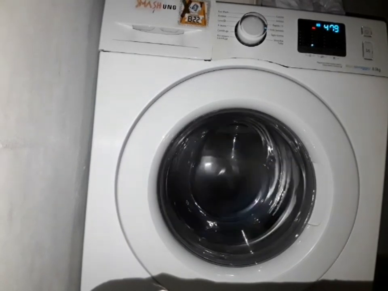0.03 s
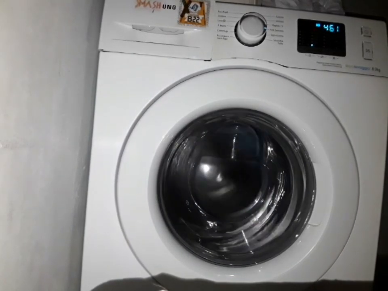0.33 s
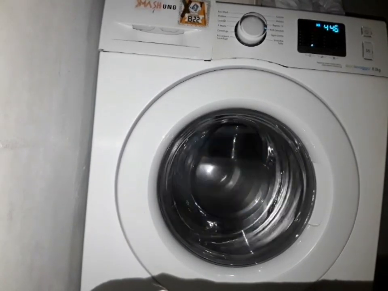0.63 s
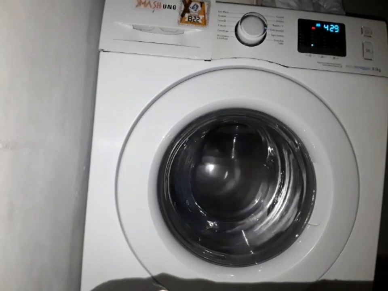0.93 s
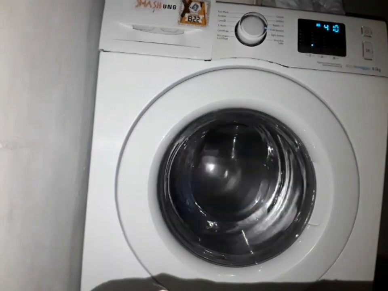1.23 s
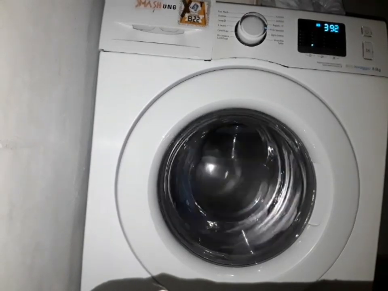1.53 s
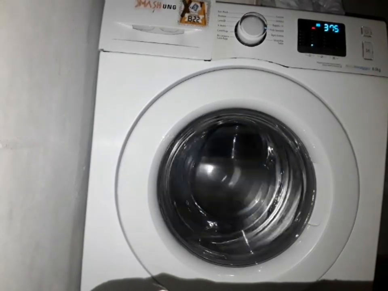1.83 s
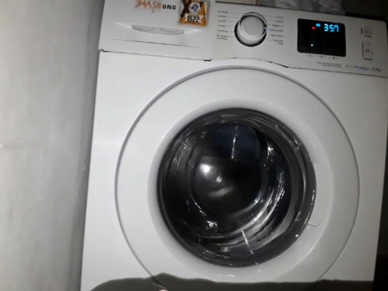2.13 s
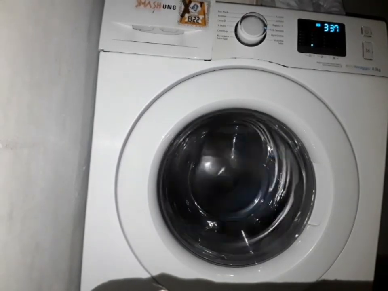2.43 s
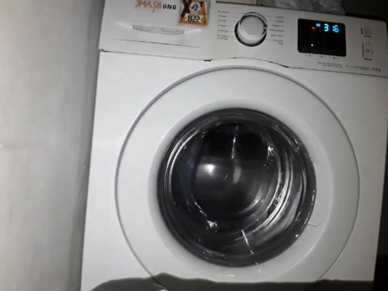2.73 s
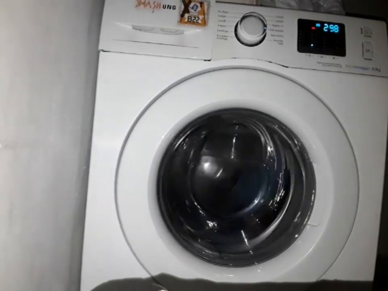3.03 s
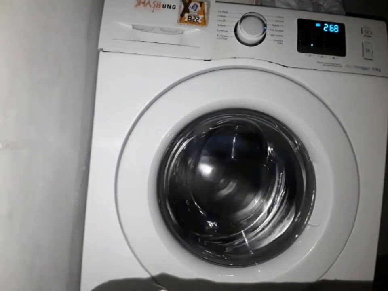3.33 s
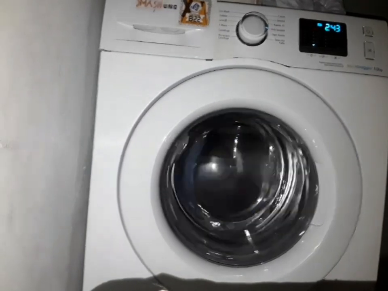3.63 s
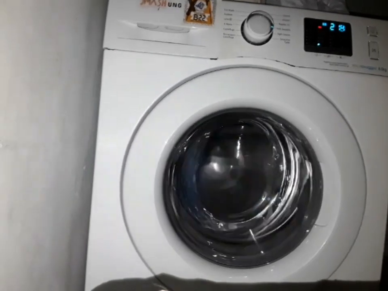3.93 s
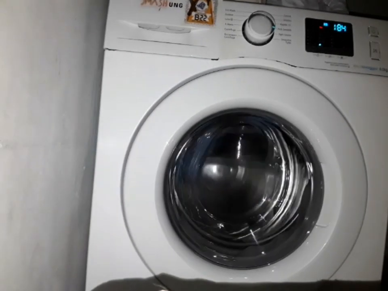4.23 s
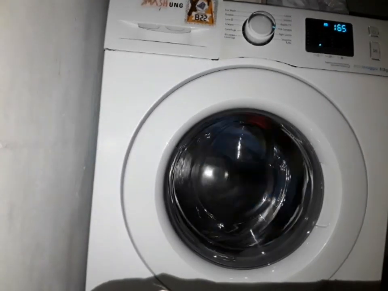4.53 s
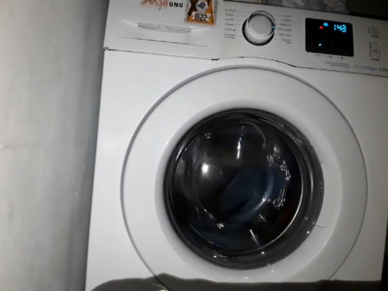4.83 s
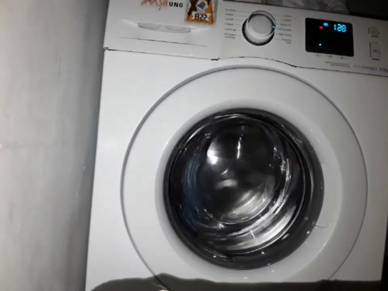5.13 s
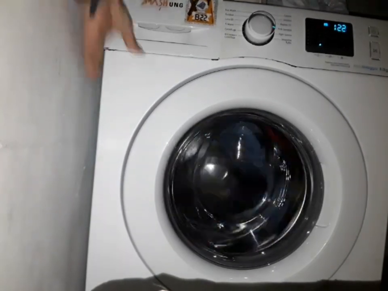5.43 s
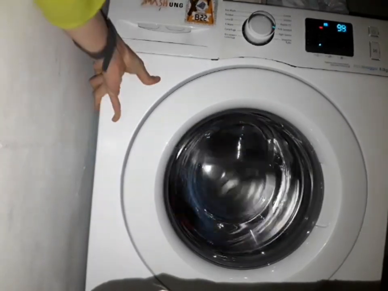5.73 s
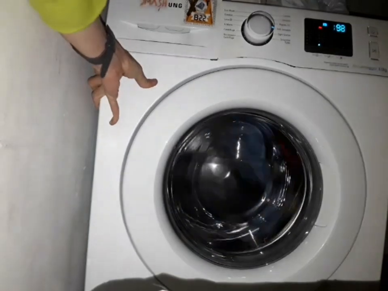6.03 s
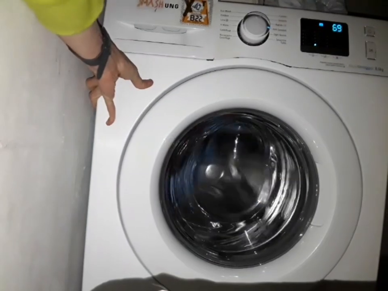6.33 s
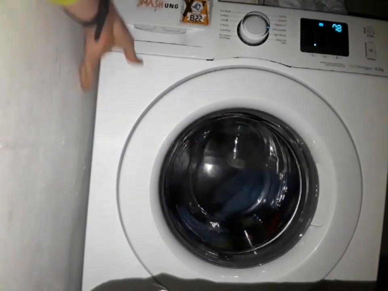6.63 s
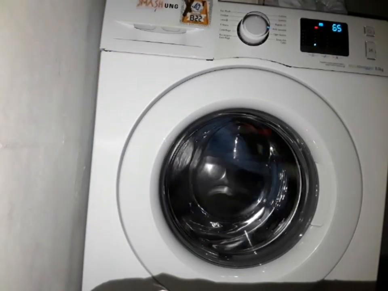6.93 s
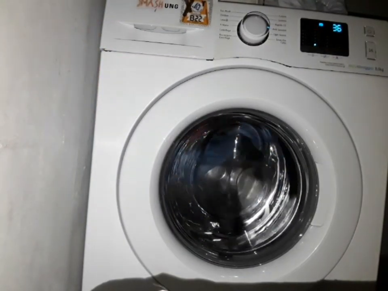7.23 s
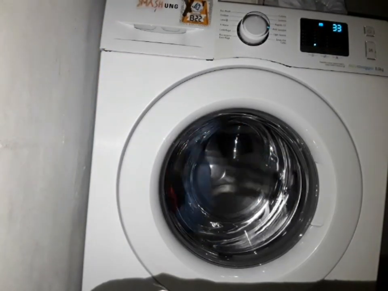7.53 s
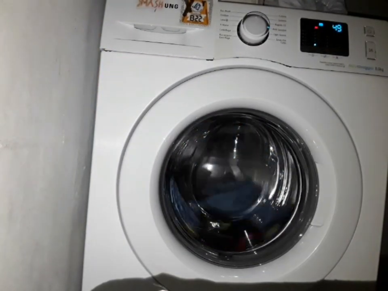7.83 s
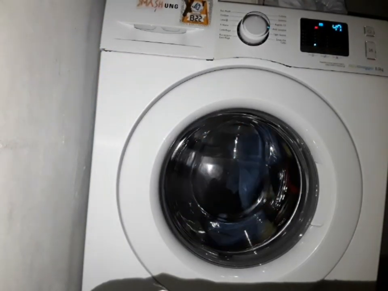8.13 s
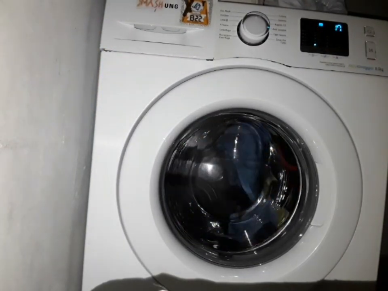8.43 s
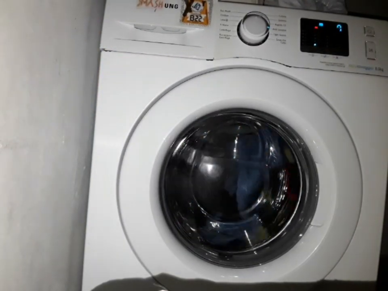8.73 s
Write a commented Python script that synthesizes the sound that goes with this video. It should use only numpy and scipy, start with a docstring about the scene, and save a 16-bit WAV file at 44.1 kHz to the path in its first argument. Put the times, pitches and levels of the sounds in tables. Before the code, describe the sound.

A washing machine slows from a rumbling, hissing spin, knocks and scrapes as it shakes, then quiets to soft flops and swishes.

```python
"""A washing machine spins down

A front-loader with a worn drum bearing coasts down from its spin in a small room. The bearing rumbles
in the same pattern on every turn while the motor's whine falls. At the speed where its springs shake
most, the tub swings out and rasps against the cabinet. Then the wet laundry comes loose, flops and
slides about, with a few squeaks and ticks, until only a soft drone and faint swishes are left."""
import sys
import numpy as np
from scipy import signal
from scipy.fft import rfft, irfft
from scipy.io import wavfile
from scipy.ndimage import uniform_filter1d

SR = 44100
rng = np.random.default_rng(int(sys.argv[2]) if len(sys.argv) > 2 else 0)


def bounce(signal):
    """Save signal as a 16-bit WAV file at the path given by the first command-line argument."""
    frames = np.transpose(np.atleast_2d(signal))
    limited = np.clip(frames, -1, 1)
    pcm = np.round(limited * 32767).astype(np.int16)
    wavfile.write(sys.argv[1], SR, pcm)


N = 387198
TIME = np.arange(N) / SR

# The drum slows down. Each row: time in seconds, speed in turns per second.
DRUM_SPEED = [(0, 8.007), (.5, 7.477), (1, 7.028), (1.5, 6.517), (2, 6.03), (2.5, 5.488), (3, 4.923),
              (3.5, 4.256), (4, 3.5), (4.5, 2.8), (5.5, 2), (6.5, 1.4), (7.5, .7), (8.8, .2)]
def drum():
    """The drum's motion: how many turns it has made so far, and how fast it is going."""
    speed, = in_time(DRUM_SPEED)
    return np.cumsum(speed) / SR, speed

# Pits in the bearing's track. Each row: position in turns, strength in dB, width in turns.
BEARING_PITS = [(0.045, -4, 0.028), (0.142, -2, 0.0088), (0.214, -26, 0.03), (0.318, -8, 0.0033),
                (0.391, -2, 0.0071), (0.436, 6, 0.045), (0.475, 0, 0.016), (0.557, -4, 0.0044),
                (0.662, -8.5, 0.0061), (0.887, 4, 0.0093), (0.949, -1, 0.0072)]
# The tone of the grinding. Each row: pitch in Hz, level in dB.
GRIND_SPECTRUM = [(20, -25), (40, -19), (65, 4), (120, -12), (250, -8.5), (400, -16), (700, -25),
                  (3000, -57)]
def bearing(turns, speed):
    """Pits knock at the same spots on every turn; as the drum slows, the rough track's grind takes over."""
    pits = sum(from_db(db) * np.exp(-(turns_from(turns, angle) / width) ** 2)
               for angle, db, width in BEARING_PITS)
    knocks = evened(cabinet(pits * from_db(.5 * drift(25)), direct=0.11), 0.0317)
    track = np.interp(turns, np.linspace(0, 1, 1024), rng.standard_normal(1024), period=1)
    roughness = colour(0.8 * rms_one(track) + 4 * noise(), GRIND_SPECTRUM)
    grind = evened(cabinet(roughness, direct=0.2), 0.043)
    knock_share = np.interp(speed, [2, 4.5, 6.5], [.15, .55, .92])
    return np.sqrt(knock_share) * knocks + np.sqrt(1 - knock_share) * grind

# The notes of the tub and cabinet panels. Each row: pitch in Hz, width in Hz, level in dB.
PANEL_NOTES = [(67.9, 4.9, -6), (80.7, 5.2, -5.5), (103.4, 9.4, -0.5), (163.7, 10.7, 3.5), (212.4, 9.2, 3),
               (250.6, 29, -1.5), (274.5, 11, 0.5), (323.6, 25, 2.5), (398, 21, -6), (495, 8.1, -27),
               (553, 17, -11.5), (660, 19, -24), (884, 25, 8)]
def cabinet(x, direct):
    """Shaken panels ring, neighbouring notes in opposite directions, over a little direct sound."""
    ringing = sum((-1) ** k * from_db(db) * resonance(x, hz, width)
                  for k, (hz, width, db) in enumerate(PANEL_NOTES))
    return ringing + direct * resonance(x, 420, 500)

# Two pushes a turn. Each row: position in turns, width in turns, then the swell of rumble, roar and
# hiss in dB, before the speed scales it.
LOAD_PUSHES = [(.04, .18, 6.5, 2.8, 2.5), (.49, 0.15, 6, 0.7, 0.6)]
def surges(turns, speed):
    """The lopsided load presses on the bearing, less as it slows: rumble, roar and hiss swells in dB."""
    swell_db = np.array([-4, -1, 1.5])[:, None]  # between the pushes
    for angle, width, *db in LOAD_PUSHES:
        away = turns_from(turns, angle) / width
        swell_db = swell_db + np.outer(db, np.exp(-away ** 4))
    return swell_db * np.interp(speed, [2, 4.5, 6.5], [.1, .45, 1.05])

SWING_SPEED, SWING_WIDTH = 4.26, 0.6  # turns per second: the tub swings most here
SETTLE_SPEED, SETTLE_WIDTH = 3.386, 0.033  # turns per second: below this the tub settles
def coasting(speed, db, fast_db, swing_db, drop_db, slow_db):
    """A running noise eases as the drum slows, changes as the tub swings, then drops as it settles."""
    doublings = np.log2(speed / SETTLE_SPEED)
    db_per_doubling = np.where(doublings > 0, fast_db, slow_db)
    swing = np.exp(-((speed - SWING_SPEED) / SWING_WIDTH) ** 2)
    settled = .5 + .5 * np.tanh((SETTLE_SPEED - speed) / SETTLE_WIDTH)
    return from_db(db + db_per_doubling * doublings + swing_db * swing - drop_db * settled)

# The tone of the roar. Each row: pitch in Hz, level in dB.
ROAR_SPECTRUM = [(250, 0.5), (450, 8), (650, 5), (780, -1), (900, 1), (1100, -3.5), (1400, -8), (2000, -12),
                 (3200, -20), (5000, -23), (9000, -33.5)]
def drum_roar():
    """The turning drum makes a gritty roar whose level flutters."""
    return from_db(1.44 * drift(70)) * colour(gritty(2500, smooth=1.0), ROAR_SPECTRUM)

# The tones of the whine. Each row: pitch as a multiple of the rate of passing bars, level in dB.
WHINE_TONES = [(2, 1), (3, 2), (3.3, -3), (3.67, -6), (4, 3), (4.3, -2), (4.67, -5), (5, 3), (5.3, -2),
               (6, 4), (6.3, -3), (7, 3), (7.3, -3)]
# How well the housing lets the whine out. Each row: pitch in Hz, gain in dB.
HOUSING_GAIN = [(4000, -6), (5500, 1), (6500, 3), (8000, 1), (10000, 3), (10800, 0), (11800, -9),
                (14000, -10), (15300, -5)]
# The hiss at high speed and at low speed. Each row: pitch in Hz, level in dB.
FAST_HISS = [(1200, -28), (2500, -4), (4000, -9.5), (5500, -9), (6500, -3), (7700, 0.5), (9000, -7),
             (10800, -10), (12000, -17), (15500, -15)]
SLOW_HISS = [(300, -6), (800, -5), (1500, -1.5), (2500, -4), (4000, -6.5), (5000, -4.5), (6000, -3.5),
             (7500, 3.5), (8300, -0.5), (9200, -7), (10800, -9.5), (12000, -17), (15500, -18)]
BARS_PER_TURN = 414.75  # motor bars that pass a brush in one turn of the drum
def motor(turns, speed):
    """Brushes hiss on the motor's spinning bars, which whine in falling tones blurred by chatter."""
    flutter = from_db(0.78 * drift(50))
    whine = 0
    for multiple, db in WHINE_TONES:
        hz = multiple * BARS_PER_TURN * speed
        phase = 2 * np.pi * multiple * BARS_PER_TURN * turns
        tone = from_db(2 * drift(14)) * (drift(200) * np.sin(phase) + drift(200) * np.cos(phase))
        whine = whine + from_db(db) * at_hz(HOUSING_GAIN, hz) * tone * (hz < SR / 2)
    whine_db = np.interp(speed, [3, 4.5, 7], [-40, -22.5, -18])
    fast_share = np.clip(speed - 3, 0, 1)
    fast_hiss = np.sqrt(fast_share) * colour(gritty(9000, smooth=1.0), FAST_HISS)
    slow_hiss = np.sqrt(1 - fast_share) * colour(gritty(3000, smooth=2.6), SLOW_HISS)
    return flutter * (fast_hiss + slow_hiss + from_db(whine_db) * whine)

# The tub rubs the cabinet. Each row: start in seconds, level in dB, contact time in seconds.
TUB_RUBS = [(3.449, -34, .012), (3.485, -19, 0.04), (3.61, -28, 0.016), (3.715, -18.5, 0.043),
            (3.768, -17, 0.011), (3.81, -30, 0.072), (3.932, -44, 0.0066), (3.989, -18.5, 0.037),
            (4.04, -28.5, 0.047), (4.107, -37, .012), (4.857, -43, 0.071)]
# The tone of the rubbing. Each row: pitch in Hz, level in dB.
RASP_SPECTRUM = [(150, -38), (500, -36), (1300, 2), (2200, -0.5), (3300, -3), (5000, -7), (7800, -2.5),
                 (9500, -15), (12000, -24), (15500, -36)]
def rasps():
    """The swinging tub sticks and slips against the cabinet; each rub opens with a crisp crack."""
    force = sum(from_db(db) * contact(s, hold, rise=0.0011, t60=.13) for s, db, hold in TUB_RUBS)
    crack = sum(from_db(.5 * db) * contact(s, .006, rise=.001, t60=.06) for s, db, _ in TUB_RUBS)
    scrape = colour(room(gritty(2500, smooth=1.0), t60=0.34, echo_db=-11), RASP_SPECTRUM)
    crackle = rms_one(high_pass(gritty(2500, smooth=.4), hz=7000, order=2))
    return force * scrape + from_db(-26) * crack * crackle

# The tub knocks and wet laundry falls. Each row: start in seconds, thud strength in dB, ring pitch
# in Hz, slap level in dB, contact time in seconds.
KNOCKS_AND_FALLS = [(3.585, -12, 436, -18, 0.038), (3.658, -32, 370, -14, 0.031),
                    (3.793, -12.5, 91, -15, 0.039), (3.887, -15.5, 114, -27, 0.012),
                    (4.052, -23, 237, -20.5, 0.073), (4.155, -22.5, 236, -26.5, 0.02),
                    (4.202, -21, 162, -33.5, 0.024), (4.368, -22, 162, -23.5, 0.012),
                    (4.411, -25.5, 164, -39, 0.048), (4.501, -29.5, 214, -30, 0.032),
                    (4.563, -29.5, 164, -41, 0.039), (4.716, -15.5, 137, -24.5, 0.0056),
                    (4.867, -28.5, 170, -31, 0.029), (4.999, -27, 157, -60, 0.01),
                    (5.105, -27, 165, -34, 0.013), (5.226, -31.5, 171.6, -36.5, 0.053),
                    (5.483, -37.5, 338, -38, 0.01), (5.714, -39, 330, -34, 0.0058),
                    (5.802, -31.5, 334, -34.5, 0.016), (5.832, -31, 282, -52, 0.016),
                    (5.953, -27, 185, -62, 0.0056), (6.043, -39, 253, -41, 0.017),
                    (6.335, -35.5, 174, -46, 0.0056), (6.503, -43.5, 320, -39, 0.038),
                    (6.64, -37.5, 162, -67, 0.011), (6.795, -47, 156, -50, 0.0098),
                    (6.958, -45, 267, -48, 0.029), (7.071, -38, 246, -46.5, 0.015),
                    (8.412, -32, 239, -47.5, 0.014), (8.426, -42, 70.4, -65, 0.031),
                    (8.47, -45, 190, -56, 0.017)]
# The tone of the thud and of the slap. Each row: pitch in Hz, level in dB.
THUD_SPECTRUM = [(25, -41), (60, 13.5), (110, 4.5), (170, -4.5), (260, -8), (380, -17.5), (700, -36),
                 (3000, -70)]
SLAP_SPECTRUM = [(120, -1), (300, 7.5), (550, 1), (800, -0.5), (1250, -5), (1700, -11.5), (2200, -17),
                 (6000, -27.5), (15000, -33.5)]
def thumps():
    """Each blow has a dull thud, a short ring of the spot it hits and a brighter slap."""
    thud, ring, slap = np.zeros((3, N))
    waver = 0.00097 * drift(90)
    for s, thud_db, hz, slap_db, hold in KNOCKS_AND_FALLS:
        push = from_db(thud_db) * contact(s, hold, rise=0.002, t60=0.16)
        near = slice(int(s * SR), int((s + .5) * SR))
        thud += push
        ring[near] += push[near] * np.sin(2 * np.pi * hz * (TIME[near] - s + waver[near]))
        slap += from_db(slap_db) * contact(s, hold, rise=0.00073, t60=0.19)
    boom = evened(cabinet(colour(noise(), THUD_SPECTRUM), direct=0.32), 0.033)
    splatter = evened(colour(grit(per_s=2500, spread_db=-0.5), SLAP_SPECTRUM), 0.056)
    return 0.79 * thud * boom + 1.17 * ring + slap * splatter

# Clacks on every fast turn. Each row: position in turns, level in dB, pitch in Hz, contact time in
# seconds (below zero, the clack starts partly faded).
SPIN_CLACKS = [(0.86, -21, 780, -0.0136), (.4, -31, 1300, 0.022)]
# Single clacks. Each row: start in seconds, level in dB, pitch in Hz, contact time in seconds.
TUMBLE_CLACKS = [(4.529, -35, 1260, 0.026), (4.718, -37.5, 1050, 0.011), (4.996, -42, 820, .012),
                 (5.047, -35.5, 960, 0.0066), (5.103, -38, 880, 0.01), (5.26, -40, 1300, 0.023),
                 (5.483, -35, 1160, 0.0086), (5.716, -33, 1300, 0.0086), (6.958, -51, 1800, .015),
                 (7.22, -49.5, 1130, 0.024), (7.675, -58, 3000, 0.0036)]
def clacks(turns, speed):
    """The load makes brief hollow rattles: on every turn of the spin, then one by one as it tumbles."""
    chatter = gritty(4000, smooth=0.71)
    spinning = speed[1:] > SWING_SPEED
    repeated = []
    for angle, *clack in SPIN_CLACKS:
        passing = np.diff(np.floor(turns - angle)) > 0
        repeated.append((TIME[1:][spinning & passing], *clack))
    out = 0
    for starts, db, hz, hold in repeated + TUMBLE_CLACKS:
        force = sum(contact(s, hold, rise=0.00046, t60=0.04) for s in np.atleast_1d(starts))
        rattle = evened(resonance(resonance(chatter, hz, 770), hz, 800), 0.0062)
        out = out + from_db(db) * force * rattle
    return out

# Laundry slides. Each row: start in seconds, length in seconds, hiss level in dB, scuff level in dB.
LAUNDRY_SLIDES = [(4.42, 0.12, -37.5, -36), (4.591, 0.052, -37, -56), (4.681, 0.074, -53, -29.5),
                  (4.772, 0.032, -41, -33.5), (4.843, 0.056, -32.5, -42), (5.03, 0.14, -46, -39.5),
                  (5.16, 0.26, -40.5, -72), (5.44, 0.28, -44.5, -56), (5.597, 0.045, -43, -54),
                  (5.78, 0.27, -58, -59), (6.113, 0.38, -58, -50), (6.48, 0.23, -48.5, -61),
                  (6.904, 0.46, -45.5, -56.5), (7.97, 0.14, -56.5, -77), (8.512, 0.27, -45.5, -60)]
def slides():
    """Wet laundry slides along the drum: how much it turns up the hiss, and the roar for a lower scuff."""
    return sum(np.outer(from_db(db), contact(s, length, rise=0.022, t60=0.31))
               for s, length, *db in LAUNDRY_SLIDES)

# The door seal squeaks. Each row: start in seconds, pitch in Hz, level in dB, contact time in seconds.
SEAL_SQUEAKS = [(4.105, 8050, -20, 0.0078), (4.237, 6440, -42, 0.016), (5.623, 7660, -34.5, 0.021),
                (5.63, 7330, -35, 0.02), (6.066, 4750, -48, .012), (6.175, 1990, -46.5, 0.038)]
def squeaks():
    """Rubber rubs on metal in short, unsteady whistles."""
    out = 0
    for s, hz, db, hold in SEAL_SQUEAKS:
        whistle = rms_one(resonance(resonance(noise(), hz, 560), hz, 560))
        out = out + from_db(db) * contact(s, hold, rise=0.0011, t60=0.094) * whistle
    return out

# Buttons hit the drum. Each row: start in seconds, level in dB.
BUTTON_TICKS = [(6.067, -41), (6.792, -45), (7.582, -60), (7.701, -50), (8.348, -52)]
def ticks():
    """Buttons tap the drum with light clicks, as bright as the motor's hiss."""
    taps = sum(from_db(db) * contact(s, 0.0024, rise=0.00037, t60=0.072) for s, db in BUTTON_TICKS)
    return taps * colour(noise(), FAST_HISS)

# The slow drive drones. Each row: time in seconds, pitch in Hz, level in dB.
DRIVE_DRONE = [(6.55, 610, -84), (6.72, 584, -50), (6.95, 579, -60), (7.5, 548, -60.5), (8.3, 546, -57),
               (8.5, 518, -65)]
# A panel hums briefly. Each row: time in seconds, level in dB.
HUM_LEVEL = [(7.45, -85), (7.7, -56), (7.9, -52), (8.02, -89)]
def drones():
    """With the drum nearly at rest, the drive gives a soft wavering tone and a panel hums low."""
    hz, drone_db = in_time(DRIVE_DRONE)
    hum_db, = in_time(HUM_LEVEL)
    phase = 2 * np.pi * np.cumsum(hz) / SR
    drone = (drift(110) * np.sin(phase) + drift(120) * np.cos(phase)) / np.sqrt(2)
    return from_db(drone_db) * drone + from_db(hum_db) * np.sin(2 * np.pi * 59.0 * TIME)

# The tone of the quiet room. Each row: pitch in Hz, level in dB.
AIR_SPECTRUM = [(25, -24), (60, 1), (105, 8), (150, -13), (215, 4), (400, 0), (600, -7.5), (750, -8),
                (1500, -39), (4000, -33), (12000, -38)]
def still_air():
    """The air in the room is a faint, low, steady noise."""
    return from_db(-57.5) * colour(noise(), AIR_SPECTRUM)

def room(x, t60, echo_db):
    """Close walls add a short blur of echoes that fades by 60 dB in t60 seconds."""
    age = TIME[:SR // 2]
    tail = rng.standard_normal(len(age)) * from_db(-60 * age / t60) * (age > .004)
    return x + from_db(echo_db) * signal.fftconvolve(x, tail / np.linalg.norm(tail))[:N]

def contact(start, hold, rise, t60):
    """A level that rises, holds while parts touch, then falls 60 dB in t60; all times in seconds."""
    out, first = np.zeros(N), int(start * SR)
    age = TIME[:min(N - first, SR)]
    fade = from_db(-60 * np.maximum(age - hold, 0) / t60)
    out[first:first + len(age)] = (1 - np.exp(-age / rise)) * fade
    return out

def noise():
    """Smooth white noise."""
    return rng.standard_normal(N)

def grit(per_s, spread_db):
    """Tiny random contacts of uneven size."""
    return (rng.random(N) < per_s / SR) * noise() * from_db(spread_db * noise())

def gritty(per_s, smooth):
    """Tiny contacts mixed with some smooth noise."""
    return rms_one(grit(per_s, spread_db=-1.0)) + smooth * noise()

def drift(rate):
    """A random wobble of typical size 1 that takes a new course rate times a second."""
    knots = rng.standard_normal(N // 20)
    return rms_one(np.interp(TIME * rate, np.arange(len(knots)), knots))

def resonance(x, hz, width_hz):
    """Lets through a band around one pitch, like a part that rings."""
    r = np.exp(-np.pi * width_hz / SR)
    feedback = [1, -2 * r * np.cos(2 * np.pi * hz / SR), r * r]
    return signal.lfilter(np.array([1, 0, -1]) * (1 - r * r) / 2, feedback, x + 1e-18)

def high_pass(x, hz, order):
    """Cuts the sound below hz."""
    return signal.sosfilt(signal.butter(order, hz, "high", fs=SR, output="sos"), x)

def colour(x, spectrum):
    """Gives a sound the tone of a spectrum, at an average level of 1."""
    return rms_one(irfft(rfft(x) * at_hz(spectrum, np.arange(N // 2 + 1) * SR / N), N))

def at_hz(spectrum, hz):
    """The gain of a spectrum at the given pitches."""
    knots, db = np.transpose(spectrum)
    return from_db(np.interp(np.log(hz + 1), np.log(knots), db))

def in_time(rows):
    """Joins timed rows with straight lines, one curve for each column after the time."""
    times, *columns = np.transpose(rows)
    return [np.interp(TIME, times, column) for column in columns]

def turns_from(turns, angle):
    """How far the drum is from a position, the short way round."""
    return (turns - angle + .5) % 1 - .5

def evened(x, window_s):
    """Holds the level near 1 from moment to moment."""
    return x / np.sqrt(np.abs(uniform_filter1d(x ** 2, int(window_s * SR))) + 1e-12)

def rms_one(x):
    """Sets the average (rms) level to 1."""
    return x / np.sqrt(np.mean(x ** 2) + 1e-20)

def from_db(db):
    """Turns decibels into a gain."""
    return 10 ** (np.asarray(db) / 20)

def scene():
    """The drum's speed drives rumble, roar and hiss; slides and blows come on top, over still air."""
    turns, speed = drum()
    rumble_swell, roar_swell, hiss_swell = from_db(surges(turns, speed))
    swish, scuff = slides()
    rumble_gain = coasting(speed, db=-17, fast_db=3, swing_db=-0.1, drop_db=11, slow_db=16.5)
    roar_gain = coasting(speed, db=-25.5, fast_db=2, swing_db=6, drop_db=7.5, slow_db=28)
    hiss_gain = coasting(speed, db=-39.5, fast_db=5, swing_db=2.5, drop_db=2, slow_db=6)
    rumble = rumble_gain * rumble_swell * bearing(turns, speed)
    roar = np.hypot(roar_gain, scuff) * roar_swell * drum_roar()
    hiss = np.hypot(hiss_gain, swish) * hiss_swell * motor(turns, speed)
    blows = room(rasps() + thumps() + clacks(turns, speed) + squeaks() + ticks(), t60=0.29, echo_db=-6)
    return (rumble + roar + hiss + blows + still_air() + drones())[None]

def record(dry):
    """A small microphone loses the deep bass; peaks are rounded and the highest treble is cut."""
    ceiling, cutoff_hz = 0.95, 15550
    rounded = ceiling * np.tanh(high_pass(dry, hz=48, order=3) / ceiling)
    return signal.sosfilt(signal.ellip(12, .1, 90, cutoff_hz, fs=SR, output="sos"), rounded)

dry = scene()
out = record(dry)
bounce(out)
```